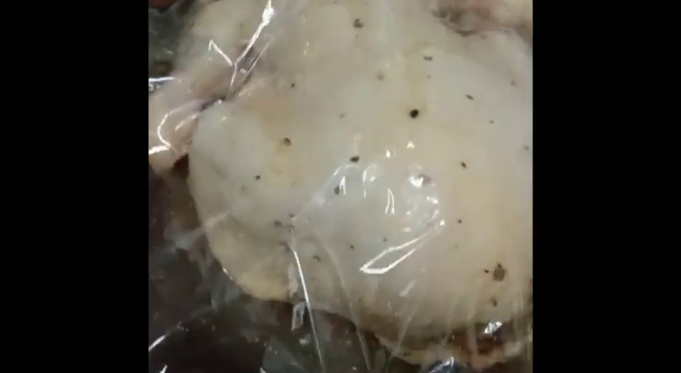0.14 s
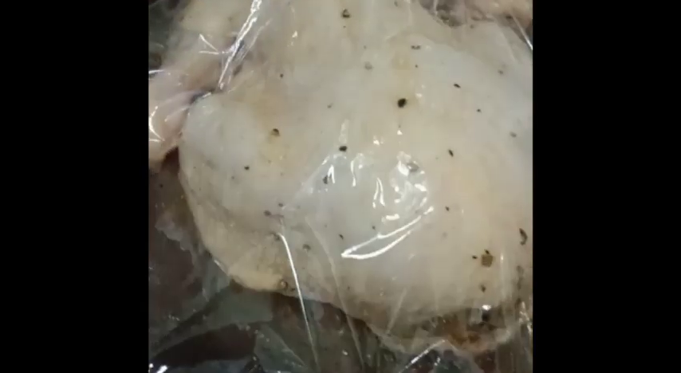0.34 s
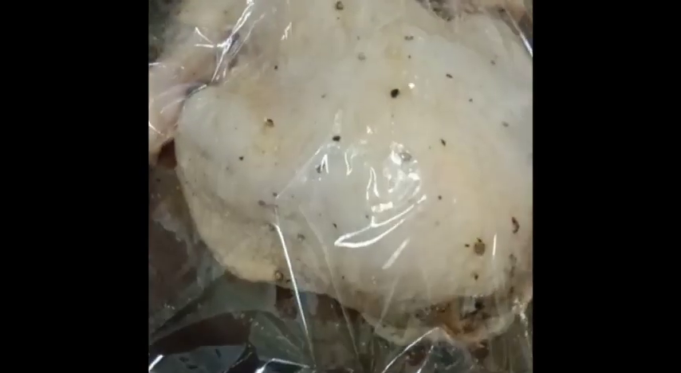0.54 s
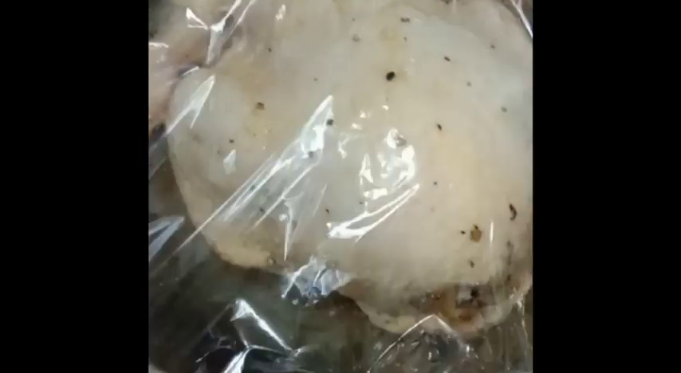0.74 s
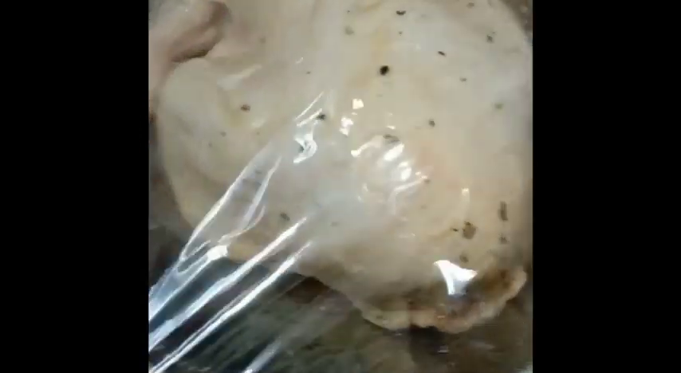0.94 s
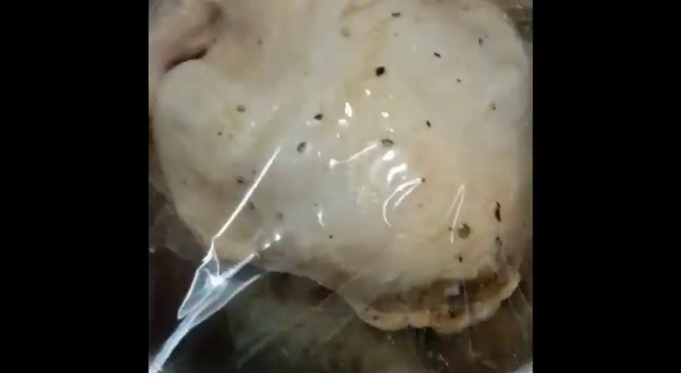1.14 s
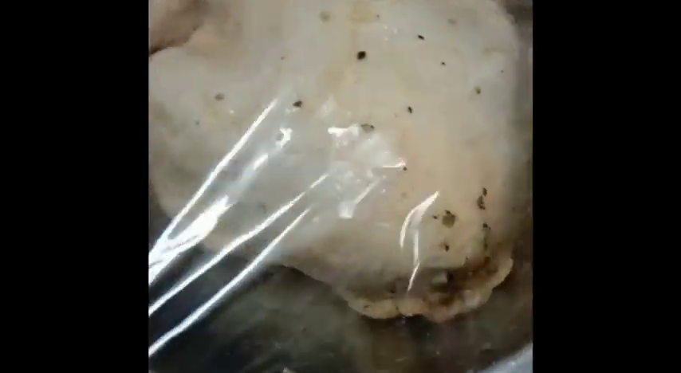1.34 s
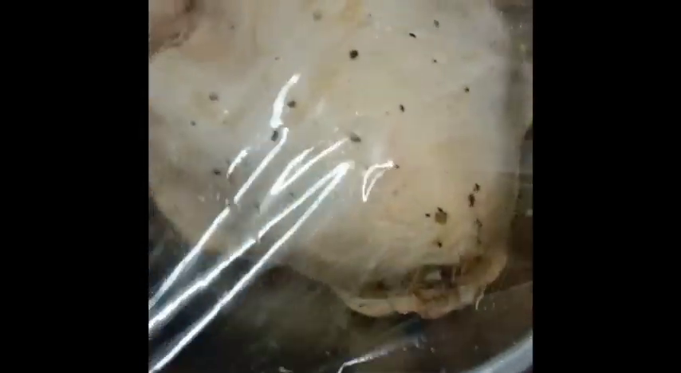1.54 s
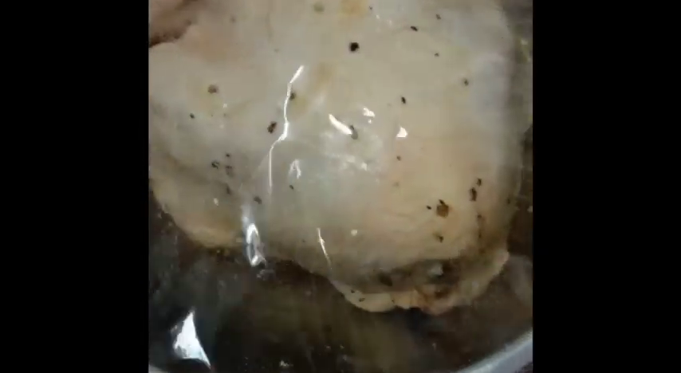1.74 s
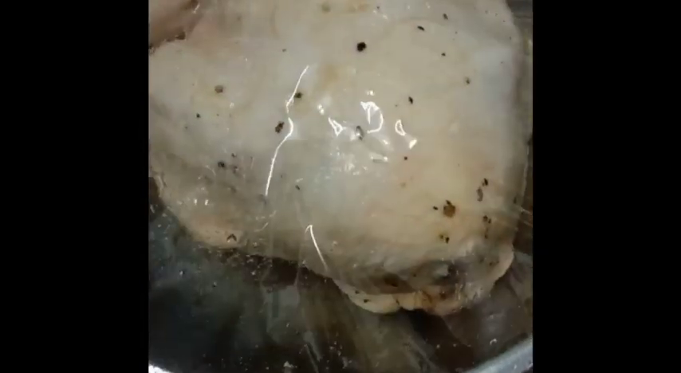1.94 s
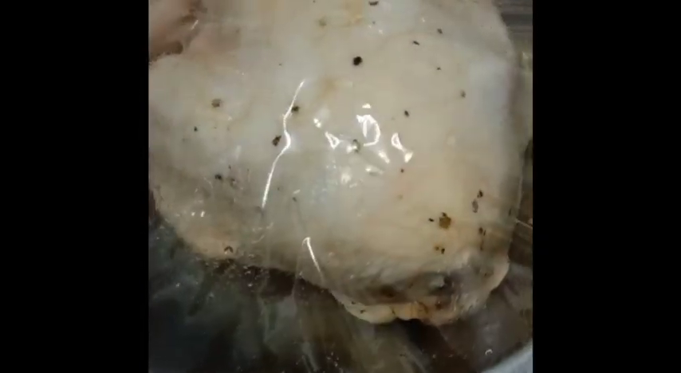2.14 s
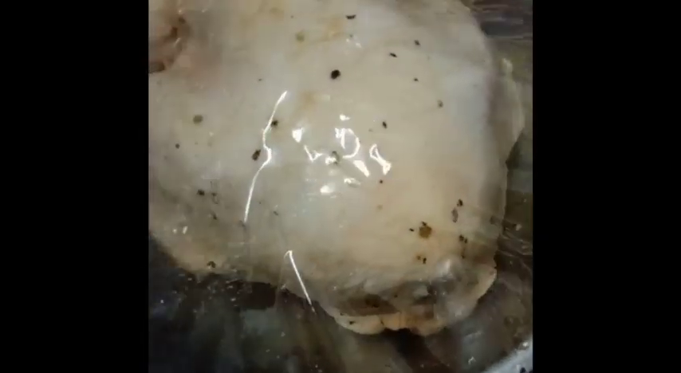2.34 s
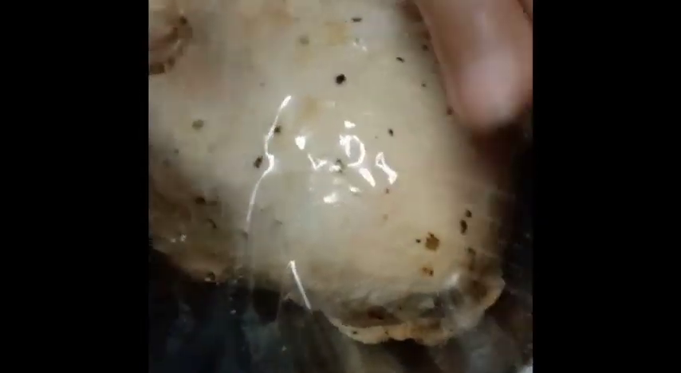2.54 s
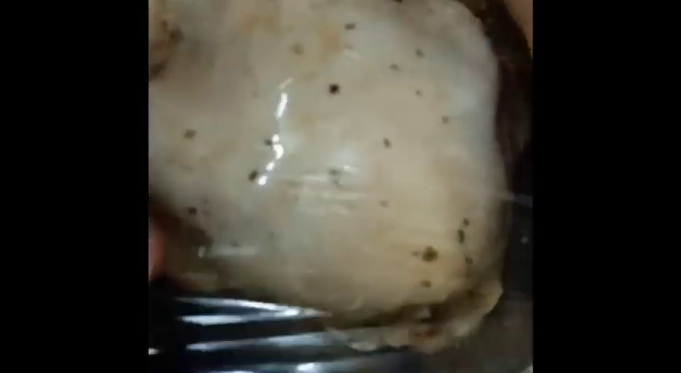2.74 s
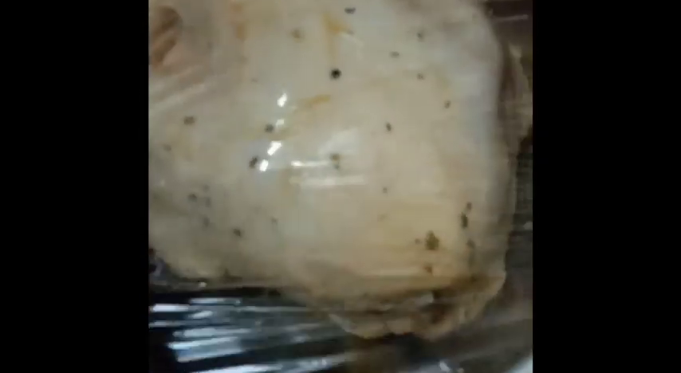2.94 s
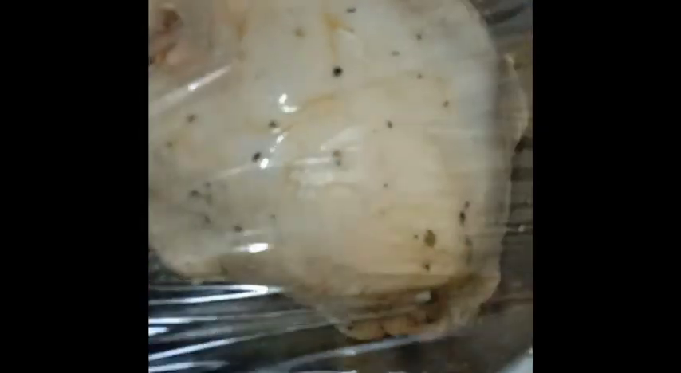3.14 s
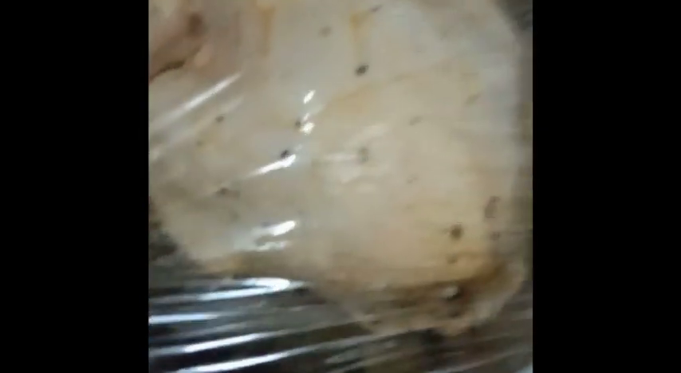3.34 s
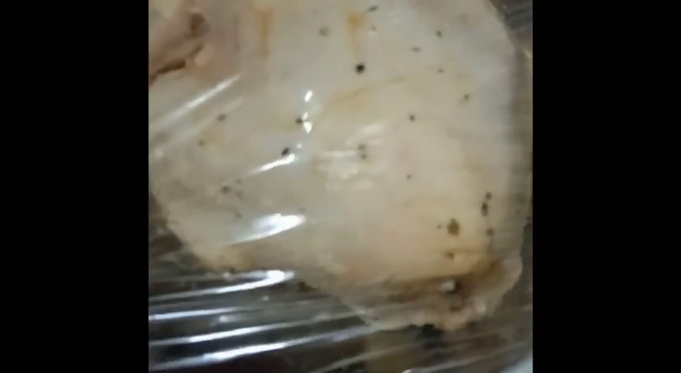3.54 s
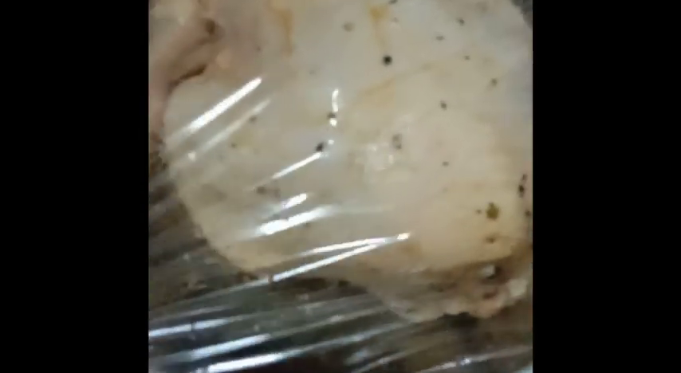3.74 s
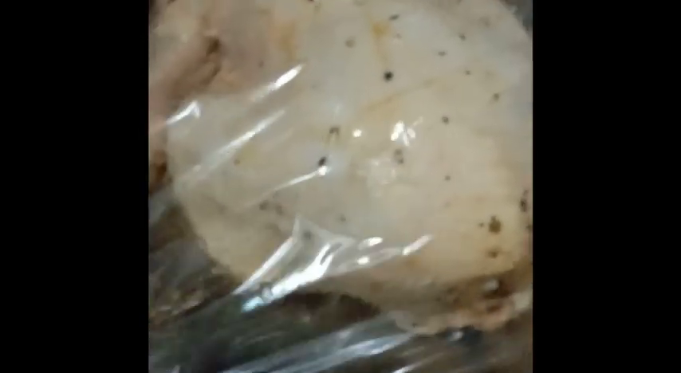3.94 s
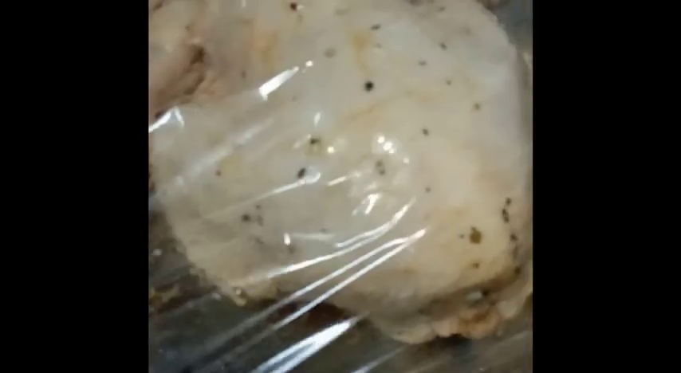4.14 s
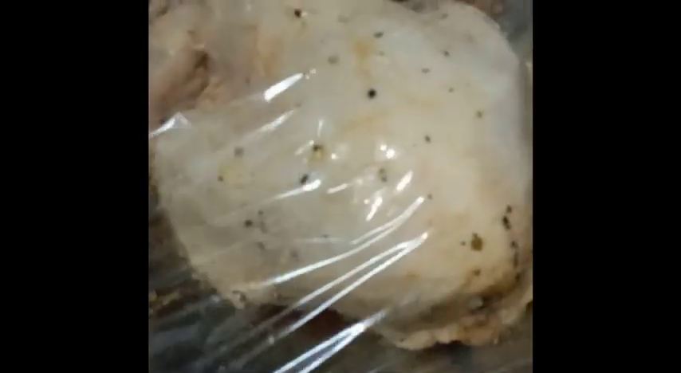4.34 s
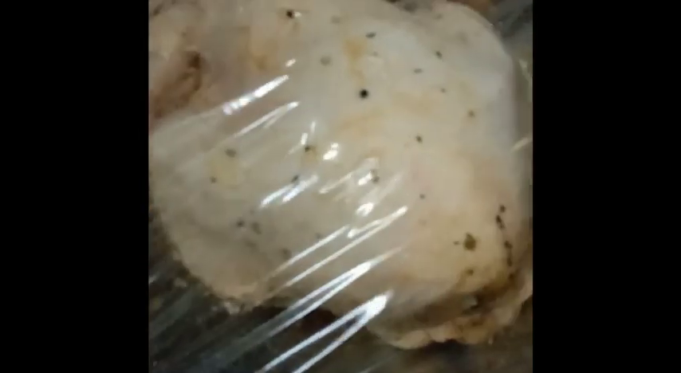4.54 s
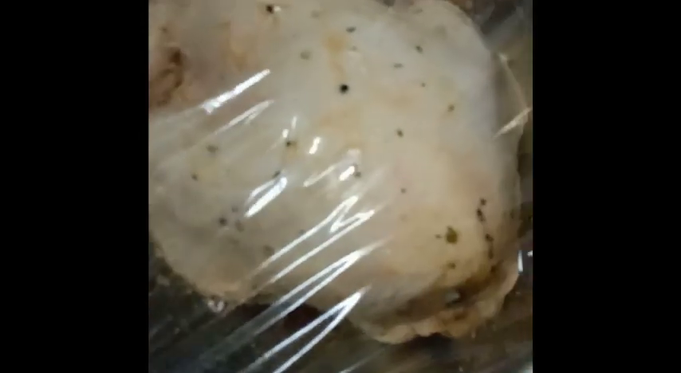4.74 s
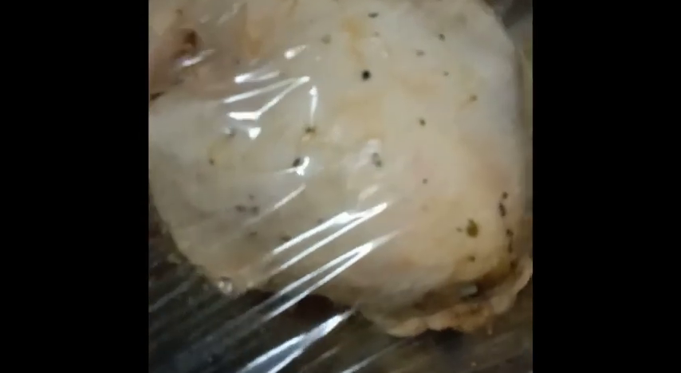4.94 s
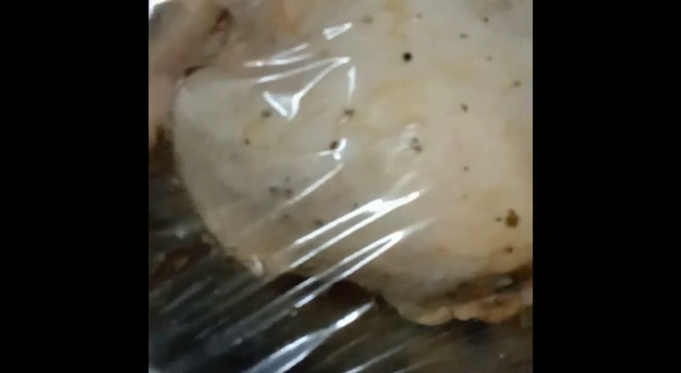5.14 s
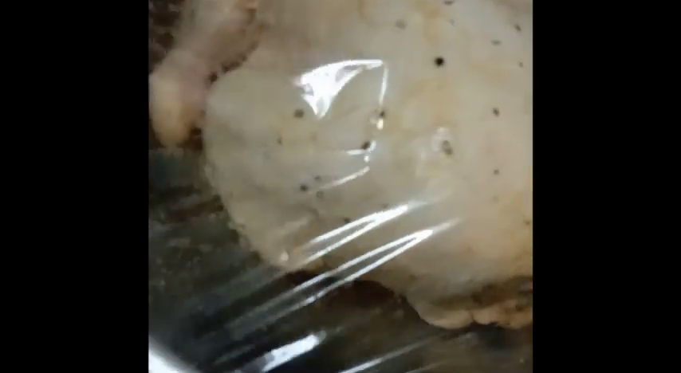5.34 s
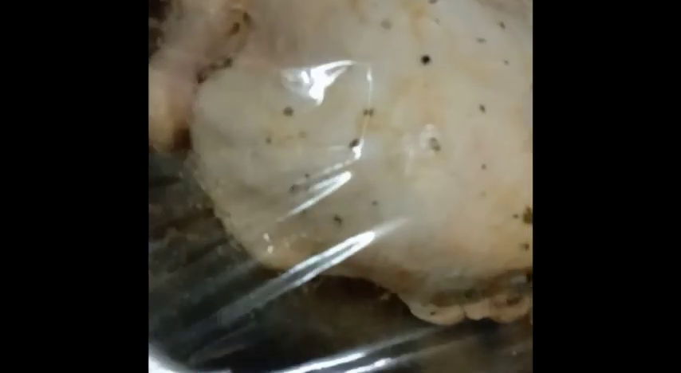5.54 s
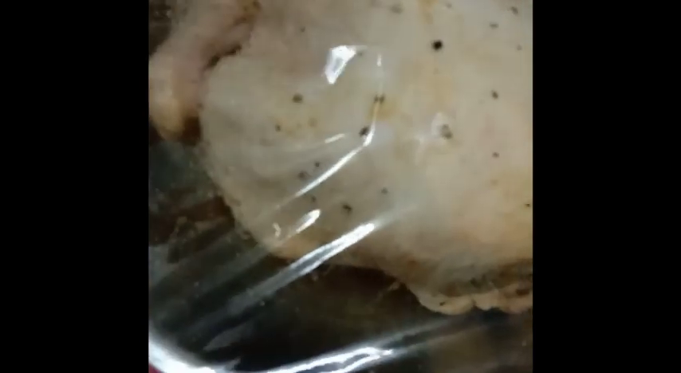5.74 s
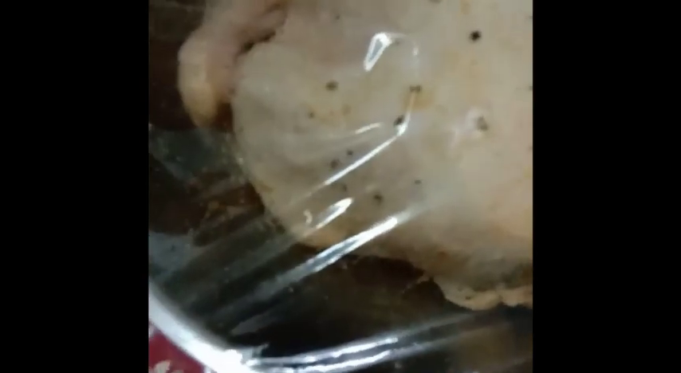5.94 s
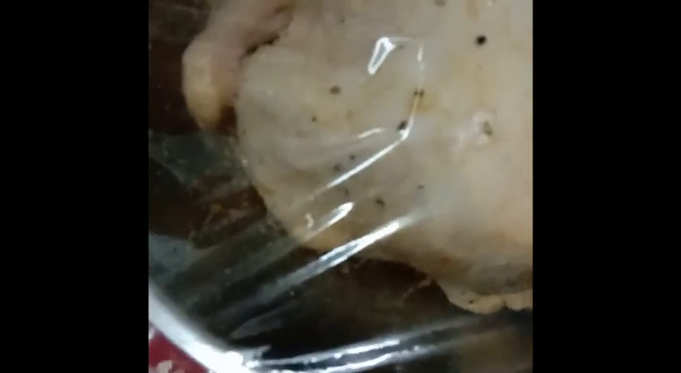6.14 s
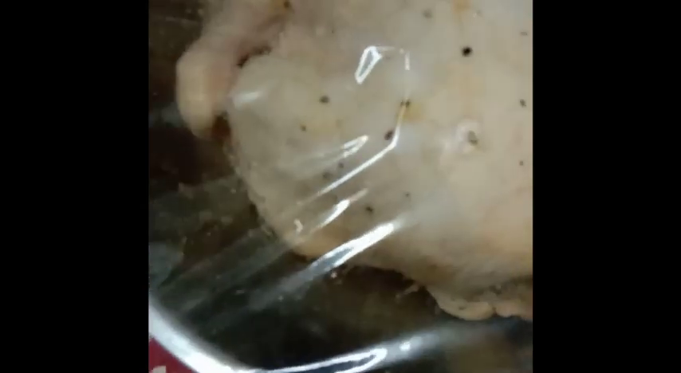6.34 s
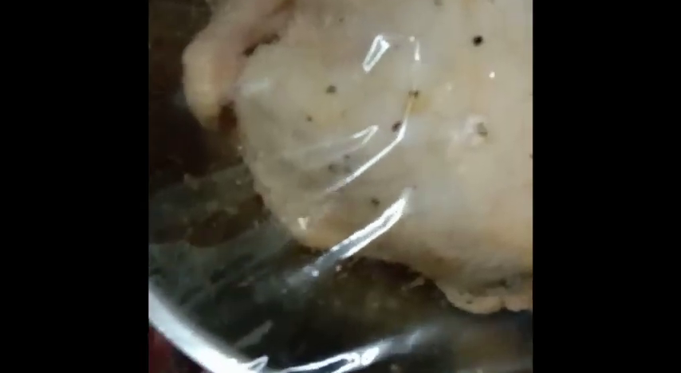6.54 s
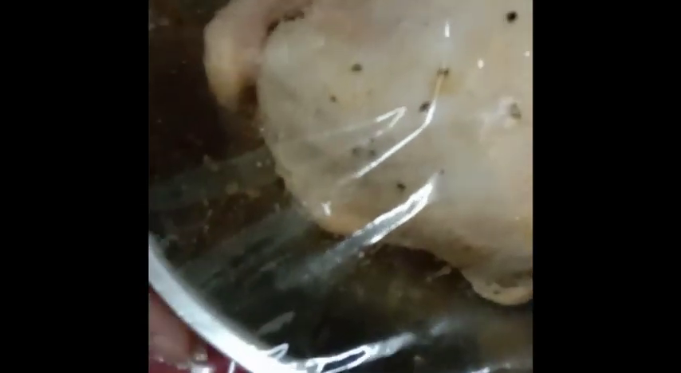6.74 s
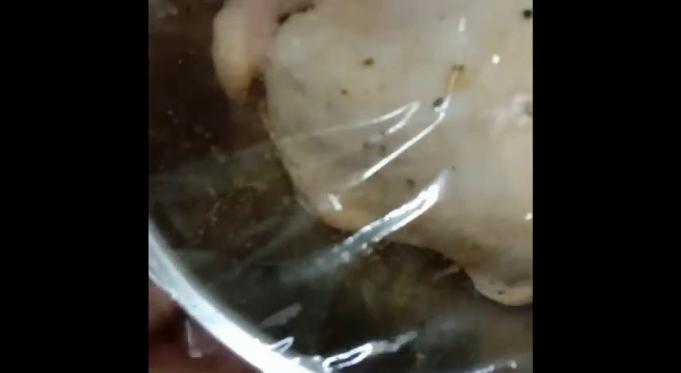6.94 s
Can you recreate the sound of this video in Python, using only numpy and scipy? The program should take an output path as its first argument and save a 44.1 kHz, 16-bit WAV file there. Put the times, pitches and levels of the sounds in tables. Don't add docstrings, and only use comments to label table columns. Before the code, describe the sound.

Hands tug cling film over a steel bowl holding a raw chicken. Sharp crackling bursts open, then thin out to near silence around two seconds. Stretching returns with loud dense crackle, squeaks and a tiny high squeal, then steady tugs and snapping creases to the end. Very close phone microphone, low handling rumble, quiet kitchen hum, short metallic bowl echoes.

```python
import sys
import numpy as np
from scipy import signal
from scipy.io import wavfile
from scipy.ndimage import uniform_filter1d

SR = 44100
rng = np.random.default_rng(int(sys.argv[2]) if len(sys.argv) > 2 else 0)


def master(y):
    cut = np.clip(np.atleast_2d(y).T, -1, 1)
    pcm = np.round(cut * 32767)
    wavfile.write(sys.argv[1], SR, pcm.astype(np.int16))


def volts(x):
    e = np.asarray(x, float) / 20
    return 10 ** e


N = 312656
STEP = 32

# pitch_hz, level_db (per Hz)
KITCHEN_COLOUR = [(24, -64.5), (75, -15.5), (140, -13.5), (297, -15), (529, -24), (1900, -30.5),
                  (2380, -44), (3060, -31), (4130, -49), (7500, -47), (7900, -30.5), (8800, -37),
                  (12000, -65)]
KITCHEN_DB = -75

# pitch_hz, level_db
RUMBLE_COLOUR = [(90, -26), (150, -2.5), (260, -14.5), (420, -35)]
# pitch_hz, level_db
BUMP_COLOUR = [(25, -44), (65, -5), (108, 6), (165, -15)]
# peak_s, rise_s (per 20 dB), fall_s (per 20 dB), level_db, bump_share_db
GRIP_SHIFTS = [(.1, .1, .15, -57, -8), (.34, .06, .05, -65, -6), (.605, .02, .25, -54, 1),
               (.8, .1, .15, -60, 0), (.97, .027, .12, -50, -1), (1.2, .07, .3, -62, -1),
               (1.45, .1, .2, -66, -6), (1.9, .9, .2, -78, 0), (2.66, .1, .08, -68, -3),
               (2.85, .11, .5, -54, -1), (3.19, .02, .3, -55, 3), (3.4, .3, .15, -44, -5),
               (3.76, .07, .2, -51, -10), (3.88, .04, .08, -50, -6), (4.11, .2, .15, -59, -1),
               (4.34, .1, .15, -62, -12), (4.51, .1, .1, -58, -6), (4.67, .06, .2, -55, -10),
               (4.9, .1, .2, -60, -6), (5.06, .07, .1, -48, .4), (5.2, .06, .05, -52, 3),
               (5.59, .4, .1, -64, -8), (5.93, .3, .1, -66, -8), (6.25, .3, .06, -65, -2),
               (6.55, .3, .8, -67, -2)]
STILL_HAND_DB = -85.5

# start_s, held_s, crackle_db, sag_db (while held), drumming_db (over crackle)
TUGS = [(0, 0.095, -29.5, -3, -4), (.262, 0.11, -38.5, -6, -5.5), (.655, 0.13, -54, -5, -16),
        (.838, .035, -48.5, -2, -24), (1.028, 0.036, -26, -0.5, -5.5), (1.343, .113, -35, -1, -13.5),
        (1.53, .19, -51.5, -12, -15), (1.73, .39, -57, -6.5, -12.5), (2.2, .015, -67.5, -7.5, -13.5),
        (2.745, 0.046, -48.5, -2, -5.5), (3.231, 0.052, -35, 3.5, -16), (3.677, .14, -28, -3.5, -8),
        (4.626, .02, -38.5, 3.5, -7.5), (4.652, 0.097, -33, -11.5, -2), (4.841, .07, -19, -10.5, -5.5),
        (4.91, .25, -29, -7.5, -7), (5.29, .01, -41, -0.5, -7.5), (5.312, 0.055, -26, -11.5, -6.5),
        (5.512, 0.099, -33.5, -10, 1), (5.683, .1, -39.5, -6.5, -0.5), (5.799, 0.082, -30.5, 3.5, -3),
        (6.097, 0.12, -36.5, -7.5, -9), (6.26, 0.17, -43, 1.5, -6), (6.649, 0.22065, -38, -11.5, -7)]
TUG_RISE_S, LET_GO_S = 0.0086, 0.055
# peak_s, rise_s (per 20 dB), fall_s (per 20 dB), crackle_db, drumming_db (over crackle)
STRETCHES = [(.12, .4, 0.1634, -29.5, -7.5), (0.883, -0.12, 0.41, -43.5, -4.5),
             (1.03, 0.0435, 0.06, -29, -1.5), (1.273, 0.24, 0.07, -44, -16.5),
             (2.025, 0.1, 0.15, -54.5, -6.5), (2.901, 0.1166, 0.23, -29.5, -2.5),
             (2.996, 0.15, 0.0356, -32, 3), (3.167, 0.2469, 2.3, -37, -9.5),
             (3.309, 0.0785, 0.02, -21.5, 2), (3.384, .065, 0.0339, -21.5, -4),
             (3.43, 0.15, -0.7, -34.5, -8), (3.498, 0.0568, 0.09, -22, -10), (3.927, 0.1645, 0.2, -32, -5),
             (4.143, .5, 0.15, -39, -3), (4.536, 0.37, 0.02, -36.5, -6), (4.829, 0.1, 0.2251, -29, -6.5),
             (5.25, 0.6, 0.5, -44, -5.5), (5.397, 0.03, 0.0848, -27, -6.5), (5.99, -0.17, .08, -33.5, -6.5),
             (6.254, 0.08, 0.08, -35.5, -8), (6.537, 0.2, 0.24, -35.5, -7), (6.986, .13, 1.5, -37, -5)]
REST_CRACKLE_DB, REST_SHEET_DB = -79.5, -90
STEEPER = 3.7
# time_s, fine_share_db (finest creases), slack_db (slack flaps over taut sheet)
HANG = [(.08, -3, -2), (.3, -5.5, -5), (.63, -6, 1.5), (.7, -24, -3), (.78, -7, -6), (1.35, -4, -10),
        (2.3, -2, -4.5), (2.95, -7, -13), (4.2, -5, -8), (4.31, -4.5, -23), (4.7, -5.5, -5),
        (5.2, -4.5, -19.5), (5.5, -9, -1), (5.9, -8.5, -3), (6.1, -8.5, -17.5), (6.3, -5, -19.5),
        (6.37, -6.5, -5), (6.8, -4, -19.5)]

# pitch_hz, level_db
TAUT_COLOUR = [(850, -44), (960, -14), (1100, -4), (1420, 1), (1800, -5), (2400, -13), (3000, -43.5)]
# pitch_hz, level_db
SLACK_COLOUR = [(280, -29), (450, -14), (560, -9), (720, -6), (900, 0), (1000, -2), (1200, -25.5)]
# start_s, length_s, first_hz, last_hz, level_db
SINGING_PATCHES = [(0, 0.14, 1110, 945, -38), (0, .1, 1300, 1400, -38), (0, 0.16, 270, 330, -47.5),
                   (.085, .03, 202, 200, -44.5), (.2, .09, 693, 725, -51.5), (.3, 0.12, 875, 854, -51),
                   (.29, .07, 1300, 1340, -50), (1.06, 0.12, 853, 784, -46.5),
                   (1.24, 0.035, 1500, 1480, -55), (1.27, 0.073, 1700, 1680, -62.5),
                   (1.36, .12, 1505, 996, -46), (1.47, 0.064, 1000, 1140, -59),
                   (1.72, .014, 2150, 2150, -60), (2.11, .035, 746, 744, -65.5),
                   (2.115, .018, 1940, 1950, -67), (2.74, 0.048, 1350, 1150, -48),
                   (2.82, 0.058, 760, 740, -46.5), (2.87, 0.098, 1267, 1200, -35.5),
                   (2.92, 0.042, 1760, 1650, -36), (2.925, .045, 2000, 1950, -37),
                   (2.93, 0.083, 1400, 1200, -35), (3.06, 0.076, 1080, 1180, -46),
                   (3.08, 0.026, 720, 720, -49), (3.15, 0.057, 1220, 1220, -44.5),
                   (3.485, 0.026, 2190, 2200, -31), (3.7, 0.042, 1500, 1690, -34),
                   (3.75, .04, 1400, 1280, -38), (3.895, 0.058, 500, 470, -48), (3.915, .04, 880, 865, -42),
                   (4.09, .09, 1255, 1096, -42), (4.13, 0.036, 904, 920, -44), (5.51, .05, 846, 800, -34.5),
                   (5.52, .025, 1440, 1440, -36), (5.8, .09, 1246, 950, -32),
                   (5.82, 0.065, 1000, 1046, -33), (5.72, 0.065, 1320, 1330, -47),
                   (6.2, .1, 960, 900, -57.5), (6.33, .09, 520, 503, -53), (6.35, 0.12, 850, 950, -52),
                   (6.39, 0.073, 1250, 1200, -49)]
# start_s, length_s, first_hz, last_hz, level_db
PEELS = [(2.26, 0.018, 7500, 7200, -72), (.649, .03, 6300, 6000, -37), (.746, .01, 3250, 3250, -52),
         (.866, .014, 1700, 1700, -50), (2.5, .19, 5200, 5400, -88), (5.08, .1, 850, 820, -48),
         (5.33, .07, 750, 650, -44), (5.39, .04, 930, 930, -40), (6.53, .07, 650, 600, -53),
         (6.97, .09, 700, 650, -53), (4.85, .04, 580, 560, -42), (4.65, .04, 480, 480, -46),
         (2.75, .03, 5500, 5000, -48.5), (3.37, 0.018, 13000, 13000, -27), (3.47, 0.044, 7540, 7000, -29),
         (3.533, .006, 13000, 13000, -30), (3.69, 0.045, 5500, 5800, -30), (4.84, 0.046, 7500, 7500, -25.5),
         (5.035, 0.018, 14500, 14500, -29), (5.305, 0.013, 10000, 10000, -28.5),
         (5.305, .03, 15000, 15000, -24)]
PATCH_WIDTH, PEEL_WIDTH = .11, .18

# start_s, length_s, first_hz, last_hz, level_db
SLIPS = [(.76, .09, 715, 705, -58), (1.546, 0.19, 2075, 2070, -67.5), (3.232, 0.015, 1663, 1712, -21.5),
         (3.378, .014, 7200, 3890, -12.5), (3.53, 0.057, 586, 512, -48.5), (3.659, 0.028, 872, 944, -36.5),
         (3.697, 0.0202, 4990, 5950, -29), (4.313, 0.028, 1294, 1164, -36.5),
         (4.34, 0.056, 1095, 1077, -44.5), (4.837, 0.023, 1253, 990, -18), (4.888, 0.013, 1215, 1340, -22),
         (5.237, 0.073, 1017, 970, -51), (5.68, 0.05, 1344, 1308, -31)]
# start_s, length_s, first_hz, last_hz, level_db
RASPS = [
    (1.03, 0.033, 882, 845, -33),
    (2.923, 0.041, 926, 798, -30.5),
    (3.263, 0.022, 2810, 3000, -28.5),
    (3.493, 0.024, 1055, 1215, -27),
    (5.87, 0.0263, 732, 789, -29),
    (6.099, 0.066, 1500, 1500, -46),
]
SLIP_BUZZ, RASP_BUZZ = 0.086, 0.72
# time_s, pitch_hz, level_db
SQUEAL = [
    (3.672, 11200, -12),
    (3.678, 10840, -22),
    (3.678, 8100, -10),
    (3.682, 10790, -32),
    (3.687, 11500, -13.5),
    (3.693, 10400, -22),
    (3.7, 11050, -23),
]

# pitch_hz, level_db (per Hz)
CREASE_COLOUR = [(1500, -42), (2200, -18.5), (3030, -5), (4110, -10), (4700, -0.5), (5500, 3), (8400, -2),
                 (9700, -10), (12400, -54.5)]
# pitch_hz, level_db
FINE_COLOUR = [(7000, -26), (8600, -3.5), (11000, -3), (13000, -4.5), (15300, 0.5), (16500, -12)]
HARD_DB, DULLING = -30.5, 0.43
# time_s, peak_db, thump_db (of the sheet)
WIDE = [(.1348, -17.5, -22), (1.539, -29.5, -25), (1.727, -46.5, -9), (2.7444, -32, -29.5),
        (3.005, -17.5, -7.5), (3.0944, -31, -31), (3.7119, -10.5, -5.5), (3.814, -17, -32),
        (3.8262, -14.5, -8.5), (3.8817, -17, -12), (3.9252, -14.5, -11), (4.006, -15, -33),
        (4.0949, -19.5, -17), (4.1714, -18.5, -48), (4.2712, -23, -15), (4.3885, -22, -39),
        (4.5094, -21, -5.5), (4.9932, -14, -8), (5.4417, -18, -7.5), (5.5093, -36, -7.5), (5.567, -20, -20),
        (5.5819, -25, -1), (5.6872, -24, 1.5), (6.159, -22.5, -4.5), (6.243, -24, -4.5), (6.3236, -19, -8),
        (6.5861, -21, -20), (6.6621, -24, -15.5), (6.977, -19, -23.5), (7.0176, -19.5, -11)]
# time_s, peak_db, thump_db (of the sheet)
MIDDLING = [(.2615, -17.5, -4.5), (.653, -23, -36), (.7506, -32.5, -19), (1.251, -30, -18),
            (1.3935, -20, -23), (1.464, -32, -4.5), (1.7817, -33, -34), (2.047, -39.5, -11),
            (2.2044, -38, -24.5), (2.8599, -18.5, -21.5), (3.1324, -28, -30), (3.5486, -7, -34),
            (3.785, -11, -29.5), (3.9705, -17, -28), (3.9877, -9.5, -34), (4.2177, -18, -16),
            (4.4523, -18, -14), (4.6518, -18, -20), (4.6742, -10, -20), (4.6875, -11, -23),
            (4.751, -18.5, -17), (5.0967, -18.5, -30.5), (5.1509, -18, -8), (5.224, -25, -29),
            (5.9481, -18, -12), (6.2109, -22, -15), (6.2547, -21, -15), (6.4896, -18.5, -15),
            (6.5315, -16, -16), (6.7532, -19, -13.5)]
# time_s, peak_db, thump_db (of the sheet)
NARROW = [(.0127, -10, -19), (.0278, -6.5, -14), (.049, -8, -26), (.0604, -8.5, -13), (.105, -9.5, -7),
          (1.366, -19, -24), (1.4168, -13.5, -14.5), (1.7504, -35, -33), (3.5365, -26.5, -12),
          (3.6444, -41, -42), (4.1246, -13.5, -15), (4.1554, -13.5, -28), (4.417, -19, -34),
          (4.6638, -15, -5.5), (5.0357, -13, -8.5), (5.3099, -15, -34), (5.7528, -20, -22.5),
          (6.928, -24, -33)]
WIDE_HZ, MIDDLING_HZ, NARROW_HZ = 5250, 7800, 15000
SIZE_SPREAD = 0.093
# time_s, peak_db
LESSER = [(.365, -38), (1.772, -40), (1.813, -40.5), (3.0418, -23.5), (4.205, -17.5), (4.5435, -24),
          (5.2886, -26.5), (5.499, -22), (6.4021, -25), (6.464, -21), (6.8212, -26.5), (6.9098, -29),
          (7.034, -19.5)]
LESSER_HZ, LESSER_THUMP_DB = 6500, -30.5
# time_s, peak_db
TICKS = [(0.0188, -14.0), (0.04, -6.0), (0.1692, -23.0), (0.5144, -57.0), (0.9369, -28.0), (1.2619, -31.0),
         (1.4643, -24.0), (1.7734, -33.0), (2.2042, -36.0), (2.8321, -23.0), (2.948, -20.0),
         (3.0948, -22.0), (3.1489, -25.0), (3.4464, -22.0), (3.5366, -16.0), (3.5855, -21.0),
         (3.6443, -22.0), (3.7564, -19.0), (3.7724, -17.0), (3.783, -15.0), (3.7876, -14.0),
         (3.8001, -17.0), (3.8288, -18.0), (3.8648, -21.0), (3.9818, -20.0), (4.0192, -21.0),
         (4.027, -19.0), (4.0933, -22.0), (4.1427, -22.0), (4.279, -24.0), (4.2867, -25.0), (4.3434, -29.0),
         (4.5534, -29.0), (4.6742, -9.0), (4.7168, -25.0), (4.8297, -22.0), (4.8344, -15.0), (4.838, -12.0),
         (4.8637, -8.0), (4.9139, -15.0), (5.0358, -14.0), (5.224, -21.0), (5.7671, -26.0), (6.2433, -21.0),
         (6.2492, -25.0), (6.2872, -27.0), (6.499, -24.0), (6.5268, -23.0), (6.6092, -23.0),
         (6.6485, -26.0), (6.7241, -24.0), (6.7325, -30.0), (6.7628, -27.0), (6.7816, -32.0),
         (6.8536, -31.0), (6.8868, -36.0), (6.9073, -32.0), (6.9756, -17.0), (7.0733, -24.0),
         (7.0853, -19.0)]
TICK_HZ, TICK_THUMP_DB = 9500, -26


def noise(n):
    return rng.standard_normal(n)


def evened(x):
    return x / np.sqrt(np.mean(x ** 2) + 1e-20)


def wander(n, samples):
    return evened(uniform_filter1d(noise(n), samples))


def steadied(x, seconds):
    power = abs(uniform_filter1d(x ** 2, int(seconds * SR)))
    return x / np.sqrt(power + 1e-9)


def curves(rows, t):
    s, *columns = np.transpose(rows)
    return [np.interp(t, s, column) for column in columns]


def colour(x, points, size=4096):
    f, db = np.transpose(points)
    hz = abs(np.fft.fftfreq(size, 1 / SR))
    gain_db = np.interp(np.log(hz + 1), np.log(f + 1), db, left=-90, right=-90)
    log_gain = np.log(volts(gain_db))
    phase = -signal.hilbert(log_gain).imag
    taps = np.fft.ifft(np.exp(log_gain + 1j * phase)).real[:size // 2]
    return signal.oaconvolve(x, taps / np.linalg.norm(taps))[:len(x)]


def resonate(x, hz, width):
    turn = np.exp(2j * np.pi * np.cumsum(hz * np.ones(len(x))) / SR)
    r = np.exp(-np.pi * width / SR)
    smooth = signal.lfilter([1 - r], [1, -r], x / turn)
    return 2 * (turn * smooth).real


def patchy(x, patch_db, size=256):
    overlap = size * 3 // 4
    z = signal.stft(x, nperseg=size, noverlap=overlap)[2]
    field = noise(z.shape)
    field = uniform_filter1d(uniform_filter1d(field, 5, axis=0), 16, axis=1)
    z = z * volts(patch_db * evened(field))
    return signal.istft(z, nperseg=size, noverlap=overlap)[1][:len(x)]


def clicks(n, per_s, spread_db):
    draw = rng.random((n, 3))
    size = volts(spread_db * np.minimum(-np.log(draw[:, 0] + 1e-9), 3))
    happens = draw[:, 2] < per_s / SR
    return size * np.sign(draw[:, 1] - .5) * happens


def add(mix, s, sound):
    part = mix[round(s * SR):][:len(sound)]
    part += sound[:len(part)]


def slow_times():
    return np.arange(0, N + STEP, STEP) / SR


def swell(t, s, rise_s, fall_s, held_s=0, sag_db=0):
    early = np.minimum(t - s, 0) / abs(rise_s)
    climb_db = 20 * (early + STEEPER * np.minimum(early + 1, 0))
    held_db = sag_db * np.clip(t - s, 0, held_s) / (held_s + 1e-9)
    fall_db = 20 * np.maximum(t - s - held_s, 0) / abs(fall_s)
    return climb_db + held_db - fall_db


def summed(shapes, rest_db):
    power = sum(volts(2 * shape) for shape in shapes) + volts(2 * rest_db)
    power_db = 10 * np.log10(power)
    return np.interp(np.arange(N), np.arange(len(power_db)) * STEP, power_db)


def kitchen():
    return volts(KITCHEN_DB) * colour(noise(N), KITCHEN_COLOUR)


def grip():
    t = slow_times()
    moves = [(db + swell(t, s, rise, fall), share) for s, rise, fall, db, share in GRIP_SHIFTS]
    level_db = summed([move for move, _ in moves], STILL_HAND_DB)
    deep_db = summed([move + share for move, share in moves], STILL_HAND_DB)
    deep = np.clip(volts(deep_db - level_db), 0, .99)
    rub = volts(3.2 * wander(N, 1300)) * noise(N)
    rumble = steadied(colour(rub, RUMBLE_COLOUR), .1)
    bumps = steadied(colour(rub, BUMP_COLOUR), .1)
    return volts(level_db + 3) * (np.sqrt(1 - deep ** 2) * rumble + deep * bumps)


def room(x):
    wall_t60, bowl_t60, bowl_db = 0.24, 0.037, 1.5
    at = np.arange(40, SR // 2, 20)
    at += rng.integers(0, 20, len(at))
    walls = volts(-60 * at / SR / wall_t60)
    bowl = volts(bowl_db - 60 * at / SR / bowl_t60)
    taps = np.zeros(SR)
    taps[at] = rng.choice([-1., 1.], len(at)) * (walls + bowl)
    taps = signal.lfilter([1], [1, -.3], taps)
    return signal.oaconvolve(x, taps / np.linalg.norm(taps))[:N]


def handling():
    t = slow_times()
    moves = [(db + swell(t, s, TUG_RISE_S, LET_GO_S, held, sag), drum) for s, held, db, sag, drum in TUGS]
    moves += [(db + swell(t, s, rise, fall), drum) for s, rise, fall, db, drum in STRETCHES]
    crackle_db = summed([move for move, _ in moves], REST_CRACKLE_DB)
    sheet_db = summed([move + drum for move, drum in moves], REST_SHEET_DB)
    return crackle_db, sheet_db


def sheet(drive):
    level_db = handling()[1]
    slack_db = curves(HANG, np.arange(N) / SR)[1]
    shake = patchy(drive + .6 * noise(N), 3.2, size=512)
    taut = steadied(colour(shake, TAUT_COLOUR), 0.038)
    slack = steadied(colour(shake, SLACK_COLOUR), 0.087)
    return volts(level_db) * (taut + volts(slack_db) * slack)


def sing(seconds, hz, last_hz, db, width):
    t = np.linspace(0, 1, int(seconds * SR))
    pitch = hz + (last_hz - hz) * t
    tone = resonate(noise(len(t)), pitch, width * hz)
    tone = resonate(tone, pitch, width * hz)
    fade = np.sin(np.pi * t ** .7) ** 1.2
    return volts(db) * steadied(evened(tone), .06) * fade


def squeak(rows, buzz=0, rough=0.059):
    t = np.arange(rows[0][0], rows[-1][0], 1 / SR)
    hz, db = curves(rows, t)
    jitter = wander(len(t), 30)
    turn = 2 * np.pi * np.cumsum(hz * (1 + rough * jitter)) / SR
    tone = np.cos(turn)
    for k in range(2, 8):
        tone += buzz ** (k - 1) * np.cos(k * turn) * (k * hz < SR / 4)
    return volts(db) * np.sqrt(2) * tone * signal.windows.tukey(len(t), .3)


def slip(seconds, hz, last_hz, db, buzz):
    start = (0, hz, db - 0.5)
    peak = (0.33 * seconds, (hz + last_hz) / 2, db)
    end = (seconds, last_hz, db - 7.5)
    return squeak([start, peak, end], buzz, rough=0.037)


def snap(peak_db, hz, thump_db):
    seconds = 0.0006
    t = np.arange(2000) / SR
    drive = noise(len(t)) * t / seconds * np.exp(-t / seconds * 1.43)
    drive += clicks(len(t), 1600, 1.7) * volts(-18 - 1300 * t)
    ring = resonate(resonate(drive, hz, 0.19 * hz), hz, 0.19 * hz)
    crack = colour(drive + 2.3 * ring, CREASE_COLOUR[:-2] + FINE_COLOUR[1:])
    thump = colour(drive, TAUT_COLOUR)
    return volts(peak_db) * (crack / abs(crack).max() + volts(thump_db) * thump / abs(thump).max())


def add_snap(film, s, peak_db, hz, thump_db):
    add(film, s - .0005, snap(peak_db, hz, thump_db))


def creases():
    calm_db, count = -31.5, 8
    clumps = volts(2.8 * wander(N, 90))
    train = clicks(N, 1100, 5) * clumps
    patch = rng.integers(0, count, N)
    out = np.zeros(N)
    for k, hz in enumerate(np.geomspace(1200, 15000, count)):
        mine = train * (patch == k)
        ring = evened(resonate(mine, hz, 0.15 * hz))
        out += mine + 0.32 * ring * np.std(mine)
    rush = volts(0.95 * (handling()[0] - calm_db))
    rustle = (.09 + .12 * clumps + rush) * noise(N)
    return steadied(patchy(steadied(out, 0.028) + rustle, 2.8), .05)


def crackle(drive):
    level_db, sheet_db = handling()
    fine_db = curves(HANG, np.arange(N) / SR)[0]
    dulling_db = DULLING * np.maximum(level_db - HARD_DB, 0)
    fine = np.clip(volts(fine_db - dulling_db), 0, .97)
    both = np.sqrt(1 - fine ** 2) * evened(colour(drive, CREASE_COLOUR[3:]))
    both += fine * evened(colour(drive, FINE_COLOUR))
    low_db = 0.48 * (sheet_db - level_db) - 8.5
    both += volts(low_db) * evened(colour(drive, CREASE_COLOUR[:4]))
    silencing_db = 2 * np.minimum(level_db + 72, 0)
    return volts(level_db + silencing_db) * both


def scene():
    drive = creases()
    film = crackle(drive) + sheet(drive)
    for rows, hz in (WIDE, WIDE_HZ), (MIDDLING, MIDDLING_HZ), (NARROW, NARROW_HZ):
        for s, db, thump_db in rows:
            add_snap(film, s, db, hz * (1 + SIZE_SPREAD * rng.standard_normal()), thump_db)
    for s, db in LESSER:
        add_snap(film, s, db, LESSER_HZ * (1 + 2 * SIZE_SPREAD * rng.standard_normal()), LESSER_THUMP_DB)
    for s, db in TICKS:
        add_snap(film, s, db - 2.5, TICK_HZ * (1 + 3 * SIZE_SPREAD * rng.uniform(-1, 1)), TICK_THUMP_DB)
    for rows, buzz in (SLIPS, SLIP_BUZZ), (RASPS, RASP_BUZZ):
        for s, *shape in rows:
            add(film, s, slip(*shape, buzz))
    add(film, SQUEAL[0][0], squeak(SQUEAL))
    for rows, width in (SINGING_PATCHES, PATCH_WIDTH), (PEELS, PEEL_WIDTH):
        for s, *shape in rows:
            add(film, s, sing(*shape, width))
    mix = volts(-1) * film + volts(-13) * room(film) + grip() + kitchen()
    return mix[None]


def low_pass(x):
    return signal.sosfilt(signal.butter(12, 16810, fs=SR, output="sos"), x)


def record(dry):
    limited = .7 * np.tanh(dry / .7)
    edge = signal.firwin(511, 15750, window=("kaiser", 9), fs=SR)
    mix = signal.oaconvolve(limited, edge[None], "same")
    return low_pass(mix)


dry = scene()
out = record(dry)
master(out)
```